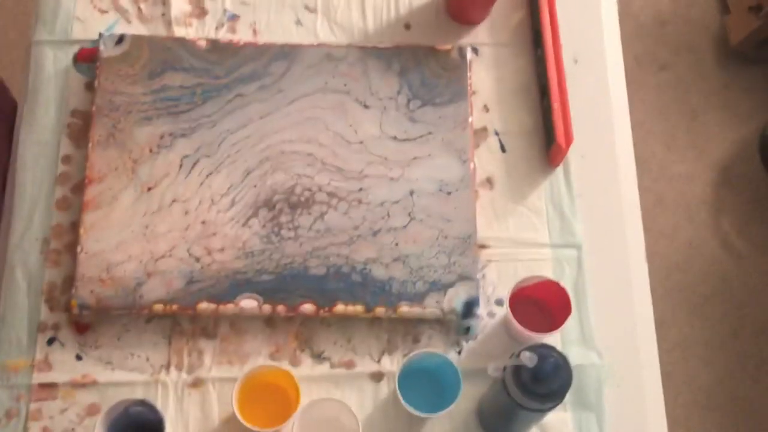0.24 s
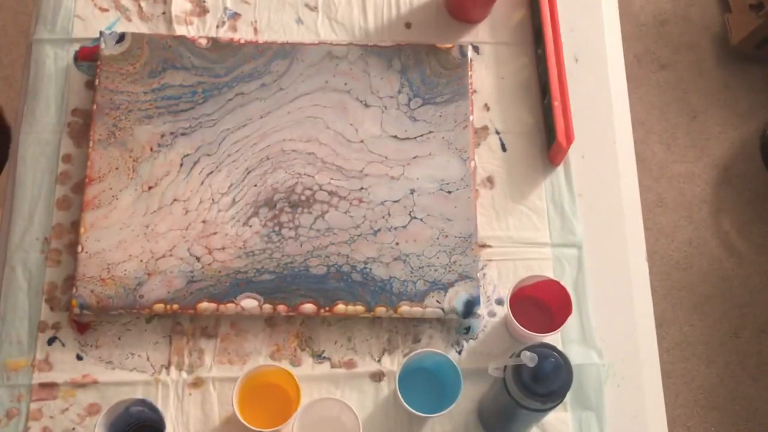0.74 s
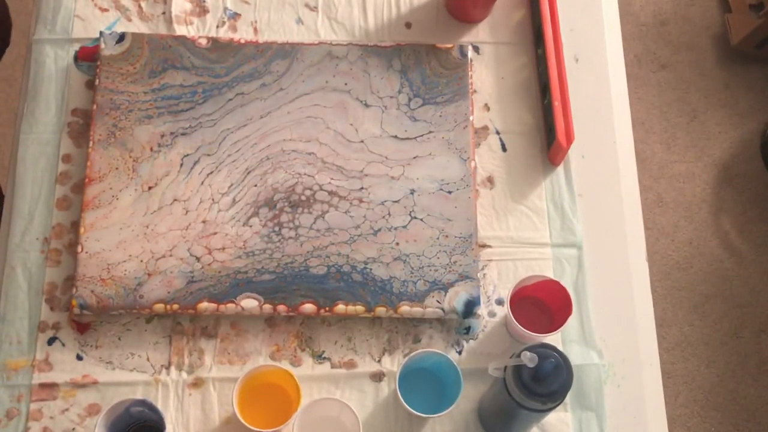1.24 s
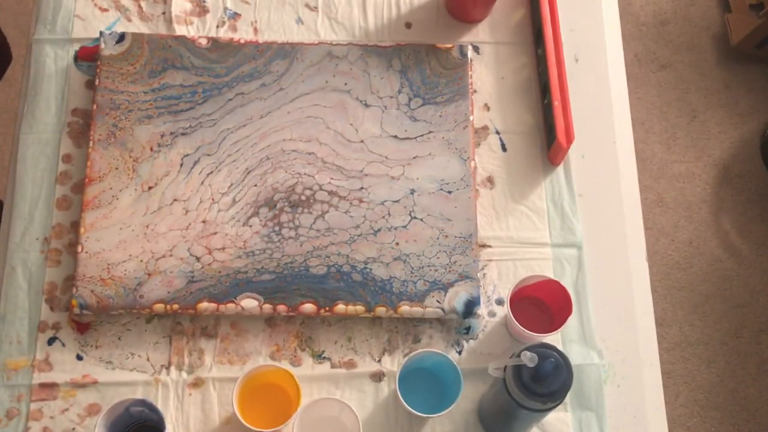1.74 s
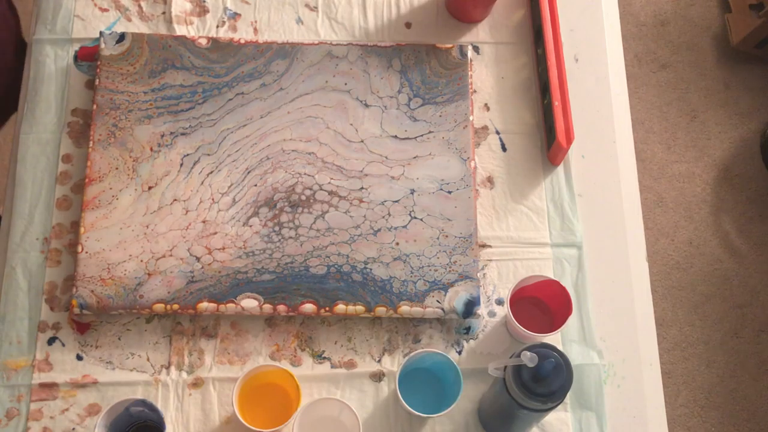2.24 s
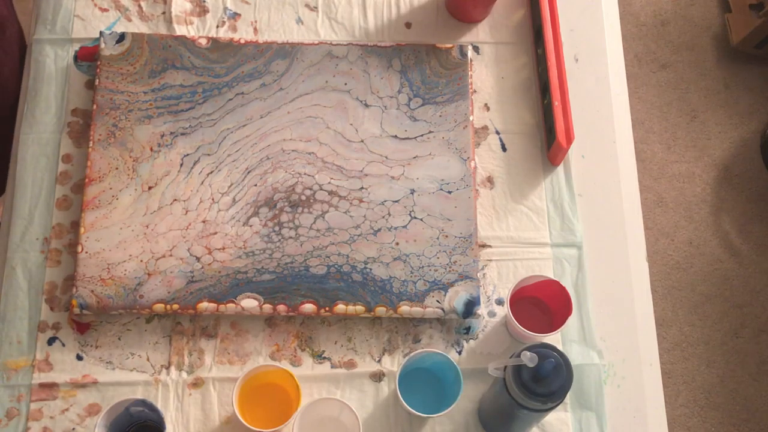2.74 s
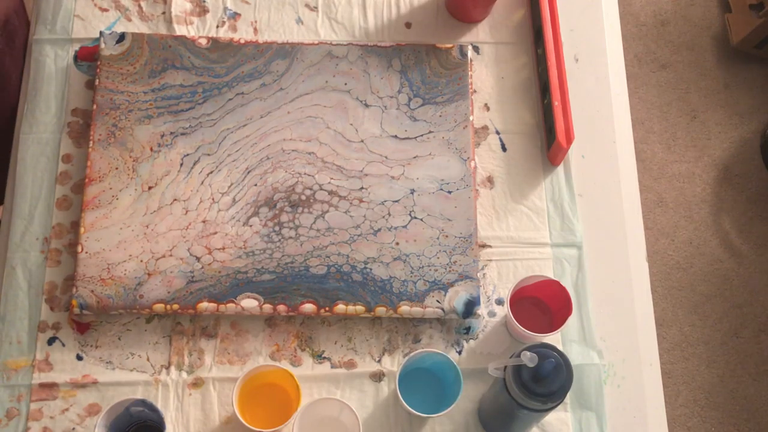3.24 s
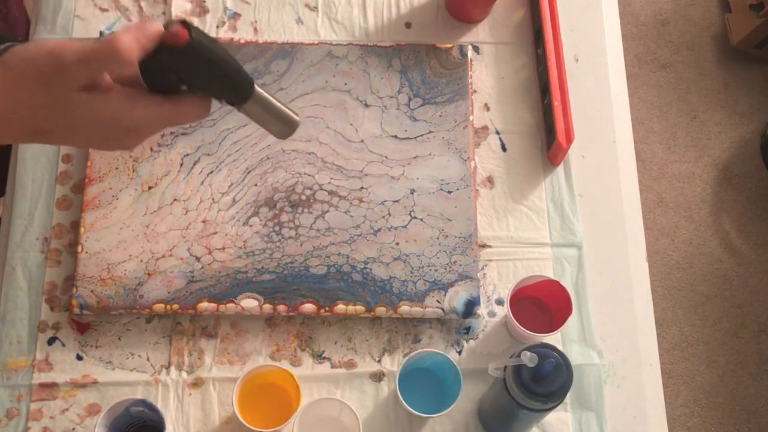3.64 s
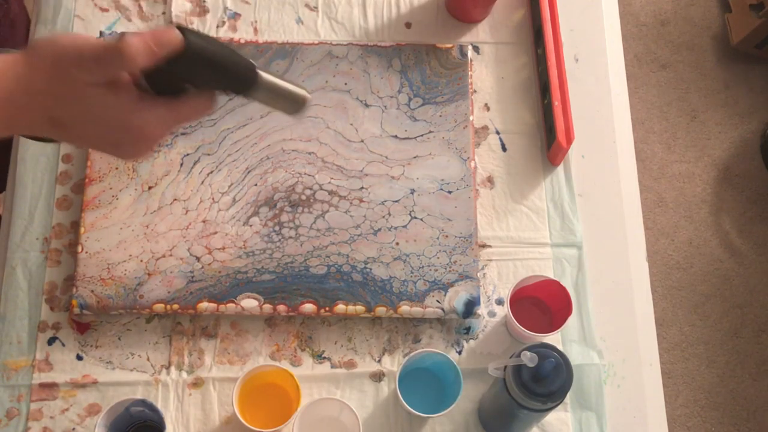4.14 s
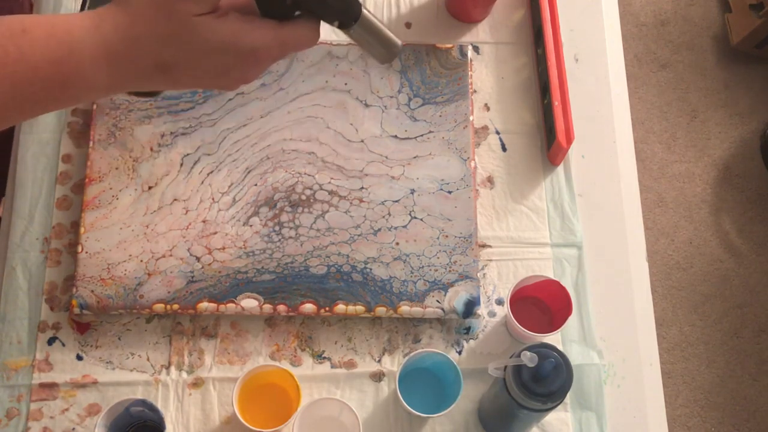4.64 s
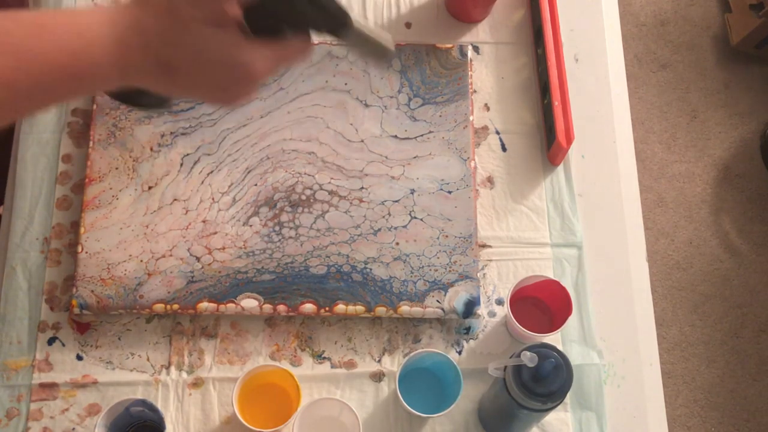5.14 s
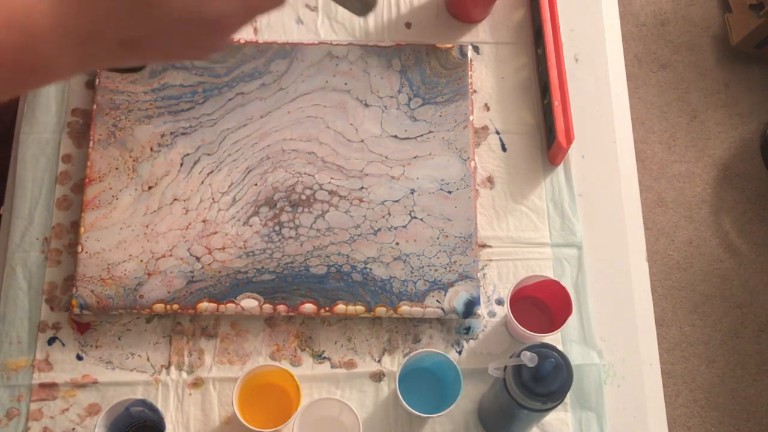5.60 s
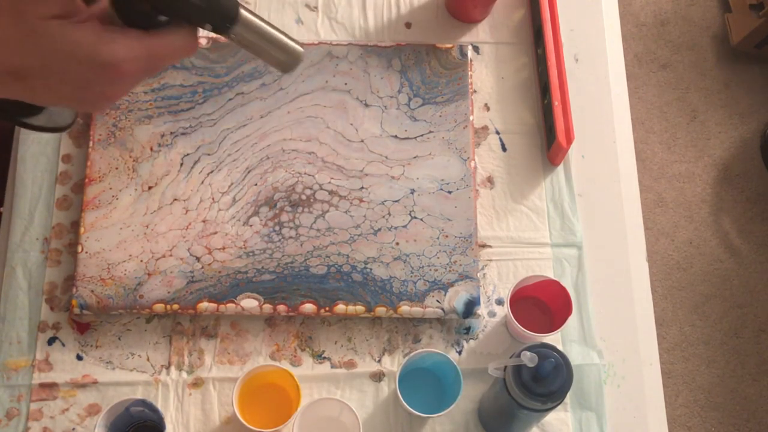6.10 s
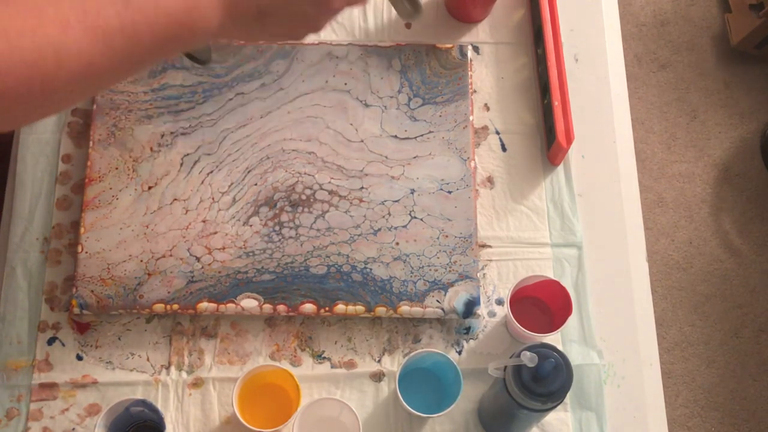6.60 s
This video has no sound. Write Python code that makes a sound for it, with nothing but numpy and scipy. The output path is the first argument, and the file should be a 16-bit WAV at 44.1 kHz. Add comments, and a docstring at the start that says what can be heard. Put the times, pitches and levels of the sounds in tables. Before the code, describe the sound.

A soft low bump opens, with fingers rubbing on plastic. Faint clicks follow, then a trigger is worked repeatedly with crisp clacks and bright metallic ticks, each squeeze releasing a steady gas hiss that soon cuts off. Two igniter snaps crack loudest, past the middle and near the end. Close microphone in a small quiet room, with short reflections, low room air and a faint high whine.

```python
"""Butane torch in a small room

A handheld butane torch is worked over a wet painting in a small, quiet room.
Clicks of trigger and catch, and two loud piezo snaps, are impacts on resonant bodies with room echoes.
Gas hiss and finger rubbing are shaped noise under moving gains; short sines make metallic pings.
A dull bump on the stand starts it; room air, a faint high sizzle and a thin whine lie behind."""
import sys
import numpy as np
from scipy import signal
from scipy.fft import rfft, irfft, next_fast_len
from scipy.io import wavfile

SR = 44100
rng = np.random.default_rng(int(sys.argv[2]) if len(sys.argv) > 2 else 0)


def pcm_store(signal):
    """Save signal as 16-bit PCM."""
    levels = np.round(np.clip(np.atleast_2d(signal), -1, 1) * 32767)
    wavfile.write(sys.argv[1], SR, levels.astype(np.int16).T)


N = 302526
BLOW_SIZE = 2048  # samples in one impact
BLOW_HZ = np.maximum(np.fft.rfftfreq(BLOW_SIZE, 1 / SR), 1)


def from_db(db):
    """Decibels to gain."""
    return 10 ** (np.asarray(db) / 20)


def unit_energy(x):
    """Scale to a sum of squares of one."""
    return x / np.sqrt(np.sum(x ** 2) + 1e-20)


def at_level(sound, db):
    """Give a blow the energy of 10 ms at this RMS level."""
    return unit_energy(sound) * from_db(db) * np.sqrt(SR / 100)


def gain_curve(rows):
    """Gain at every sample, interpolated in dB between rows of (s, dB)."""
    s, db = np.transpose(rows)
    return from_db(np.interp(np.arange(N) / SR, s, db))


def cut(x, hz, kind, order=2):
    """Butterworth low- or high-pass."""
    sections = signal.butter(order, min(hz, 0.45 * SR), kind, fs=SR, output="sos")
    return signal.sosfilt(sections, x)


def add(track, s, sound):
    """Mix a sound into the track at a time."""
    at = max(round(s * SR), 0)
    track[at:at + len(sound)] += sound[:N - at]


def at_hz(spectrum, hz):
    """Read rows of (Hz, dB) on a logarithmic frequency axis."""
    points_hz, db = np.transpose(spectrum)
    return np.interp(np.log(hz), np.log(points_hz), db)


def noise(spectrum):
    """Steady Gaussian noise with a density given as (Hz, dB per Hz)."""
    size = next_fast_len(N, real=True)
    hz = np.maximum(np.fft.rfftfreq(size, 1 / SR), 1)
    gain = from_db(at_hz(spectrum, hz)) * np.sqrt(SR / 2)
    return irfft(rfft(rng.standard_normal(size)) * gain, size)[:N]


def drift(rate):
    """A value that wanders around zero, through this many random points a second."""
    points = rng.standard_normal(N // 20)
    return np.interp(np.arange(N) * rate / SR, np.arange(len(points)), points)


def waver(rate, depth_db):
    """A gain that wanders at random in dB."""
    return from_db(depth_db * drift(rate))


def struck(db):
    """Minimum-phase impact on a damped body: everything starts at once, peaks ring on."""
    cepstrum = irfft(np.log(from_db(db)))
    cepstrum[1:BLOW_SIZE // 2] *= 2
    cepstrum[BLOW_SIZE // 2 + 1:] = 0
    return irfft(np.exp(rfft(cepstrum)))


def resonance(hz, width_hz):
    """Bell of height one over the frequencies of a blow."""
    return 1 / (1 + (2 * (BLOW_HZ - hz) / width_hz) ** 2)


def chatter(sound, gap_s, rebound):
    """Loose parts rebound at shrinking gaps: allpasses spread the blow without colouring it."""
    spectrum = rfft(sound)
    lags = np.round(gap_s * SR * rng.uniform(0.7, 1.3, size=3) / 2 ** np.arange(3))
    for lag in lags:
        delay = np.exp(-2j * np.pi * BLOW_HZ * lag / SR)
        spectrum = spectrum * (delay - rebound) / (1 - rebound * delay)
    return irfft(spectrum)


def room(sound, wet_db, t60, treble_t60, treble_db, ceiling_db):
    """Direct sound, a table bounce, two ceiling bounces and a diffuse tail, drawn anew for each call."""
    t = np.arange(SR // 2) / SR
    white = rng.standard_normal(len(t))
    dull = cut(white, 7000, "low", order=1)
    treble = white - dull
    tail = dull * from_db(-60 * t / t60) + treble * from_db(treble_db - 60 * t / treble_t60)
    response = from_db(wet_db) * unit_energy(tail * (1 - np.exp(-t / 0.00048)))
    response[int(rng.uniform(0.0014, 0.0022) * SR)] += from_db(-10)  # table
    response[(rng.uniform(0.009, 0.0105, size=2) * SR).astype(int)] += from_db(ceiling_db)
    response[0] += 1  # direct
    return signal.fftconvolve(sound, response)


# Room air. Each row: frequency in Hz, density in dB per Hz.
AIR_DENSITY = [(15, -107), (30, -98), (48, -74.5), (75, -88), (118, -81.5), (150, -90.5), (400, -90),
               (600, -89), (1050, -89.5), (1500, -96.5), (2200, -106), (3500, -114), (7000, -119),
               (16000, -122)]


def air():
    """Steady noise, strongest in the bass."""
    return noise(AIR_DENSITY)


# Narrow high sizzle. Each row: frequency in Hz, density in dB per Hz before wavering.
SIZZLE_DENSITY = [(3700, -135), (4150, -108), (4400, -95), (4580, -95), (4850, -102), (5100, -106),
                  (5350, -109), (5700, -109), (6300, -130)]


def sizzle():
    """Narrow noise band, its level wavering slightly."""
    return noise(SIZZLE_DENSITY) * waver(rate=11, depth_db=-0.5)


WHINE_HZ, WHINE_DRIFT_HZ, WHINE_DRIFTS_PER_S = 5050, 49.5, 1.5
WHINE_START_DB, WHINE_FADE_DB_PER_S = -72.5, 0.5
WHINE_SWELL_DB, WHINE_SWELLS_PER_S = 3.5, 3.8


def whine():
    """Thin, unsteady tone: narrow noise around a drifting pitch, swelling at random and slowly fading."""
    pitch_hz = WHINE_HZ + WHINE_DRIFT_HZ * drift(WHINE_DRIFTS_PER_S)
    phase = 2 * np.pi * np.cumsum(pitch_hz) / SR
    blur = cut(rng.standard_normal(N) + 1j * rng.standard_normal(N), 55, "low")
    tone = unit_energy((blur * np.exp(1j * phase)).real) * np.sqrt(N)  # unit RMS
    fade = from_db(WHINE_START_DB - WHINE_FADE_DB_PER_S * np.arange(N) / SR)
    return tone * fade * waver(WHINE_SWELLS_PER_S, WHINE_SWELL_DB)


# Bumps on the stand. Each row: start in seconds, gain in dB.
STAND_BUMPS = [(.008, -43.5), (.049, -30), (.087, -40.5)]
# Low modes of the stand. Each row: frequency in Hz, relative level in dB, t60 in seconds.
STAND_MODES = [(41.8, -7, 0.94), (74.7, -14, 0.52), (106.8, 2, 0.19), (138, -13, 0.1), (212, -14, 0.21),
               (313, -10, 0.1), (332.5, -3.5, 0.18)]
# Dull scuff that comes with a bump. Each row: frequency in Hz, relative density in dB per Hz.
SCUFF_DENSITY = [(20, -6), (60, 8.5), (170, -1), (370, -0.5), (450, -14), (1400, -18.5), (2600, -24),
                 (4500, -29), (16000, -49)]


def stand():
    """Soft bumps scuff the stand and set its low modes ringing."""
    out, t = np.zeros(N), np.arange(SR) / SR
    thud = sum(from_db(db - 60 * t / t60) * np.sin(2 * np.pi * hz * t) for hz, db, t60 in STAND_MODES)
    soft_onset = 1 - np.exp(-t / 0.0047)
    for s, db in STAND_BUMPS:
        scuff = from_db(-31.5) * noise(SCUFF_DENSITY)[:SR] * np.exp(-t / 0.032)
        add(out, s, from_db(db) * (thud + scuff) * soft_onset)
    return out


# Skin on plastic. Each row: frequency in Hz, density in dB per Hz before motion.
RUB_DENSITY = [(700, -120), (1600, -102), (2700, -103), (4000, -107), (7500, -116), (8600, -112),
               (10500, -120), (12000, -116), (16000, -119)]
# Fingers shift on the grip. Each row: middle in seconds, time from middle to 1/e in seconds, gain in dB.
GRIP_SHIFTS = [(0.055, 0.044, 12.5), (0.424, 0.18, -3), (0.77, 0.048, -2.5), (1.19, 0.13, -2.5),
               (2.503, .85, -3), (3.52, .05, 4)]
HOLD_DB = -12.5  # gain of the hand that merely holds on


def fingers():
    """Skin sticks and slips on the plastic grip; now and then a slip gives a tiny tick."""
    t = np.arange(N) / SR
    shifting = sum(from_db(db) * np.exp(-((t - s) / fall_s) ** 2) for s, fall_s, db in GRIP_SHIFTS)
    motion = from_db(HOLD_DB) + shifting
    rub = noise(RUB_DENSITY) * waver(rate=81, depth_db=5)
    slips = (rng.random(N) < 16 / SR) * from_db(rng.normal(-46.0, 3, N))  # 16 per s on average
    return (rub + cut(slips, 4000, "high")) * motion


# Torch body resonances. Each row: frequency in Hz, width in Hz, mean lift in dB before tilting.
BODY_RESONANCES = [(1577, 620, 16.5), (2610, 790, 5), (3980, 420, 5), (5890, 470, 1.5), (8540, 840, 2.5),
                   (8850, 190, -2), (11400, 700, 2.5), (15100, 1300, 1.5)]
# Edges of the hollow, middle, bright and top registers [Hz].
REGISTER_BOUNDS_HZ = [900, 2300, 6500, 12500, 16000]


def body_response(levels_db, scatter_db, low_hz):
    """Body resonances in dB, lifted differently on every blow, tilted toward the register levels."""
    db = 20 * np.log10(BLOW_HZ ** 3 / (BLOW_HZ ** 3 + low_hz ** 3) + 1e-3)
    for hz, width_hz, lift_db in BODY_RESONANCES:
        db = db + (lift_db + scatter_db * rng.standard_normal()) * resonance(hz, width_hz)
    bands = list(zip(REGISTER_BOUNDS_HZ, REGISTER_BOUNDS_HZ[1:]))
    own_db = []
    for low, high in bands:
        inside = (BLOW_HZ > low) & (BLOW_HZ < high)
        own_db.append(10 * np.log10(np.sum(from_db(db[inside]) ** 2)))
    centres_hz = np.sqrt(np.prod(bands, axis=1))
    tilt = np.transpose([centres_hz, np.subtract(levels_db, own_db)])
    return db + at_hz(tilt, BLOW_HZ)


TICKS_PER_S, TICK_DB, TICK_SPREAD_DB = 1.8, -60, 4


def faint_ticks():
    """Loose parts tick at random moments, each with its own strength and colour; rows as for clicks."""
    count = int(TICKS_PER_S * N / SR)
    s = (np.arange(count) + rng.random(count)) * (N / SR) / (count + 1)
    levels_db = [TICK_DB, 0, 0] + TICK_SPREAD_DB * rng.standard_normal((count, 3))
    return np.column_stack([s, levels_db])


HAND_ECHO_DB, HAND_ECHO_S = -9, (0.0003, 0.0009)


def off_hand(sound):
    """A very early bounce off the hand, with a new delay each time, ripples the colour of a click."""
    lag = int(rng.uniform(*HAND_ECHO_S) * SR)
    return sound + from_db(HAND_ECHO_DB) * np.pad(sound, (lag, 0))[:len(sound)]


# Trigger and catch clicks. Each row: start in seconds, direct level in dB over 10 ms,
# hollow ring in dB and brightness in dB, both against the middle register.
TRIGGER_CLICKS = [(.126, -50, -10, -2), (.1728, -51.5, -13, -6), (.8126, -56.5, -10, -3),
                  (.8396, -49.5, 8, 4), (.975, -56, 6, -4.5), (1.1718, -54.8, -2, -7),
                  (1.359, -48.5, -5, -3), (1.4095, -46.5, 5.5, 4.5), (1.482, -29.5, -8, -4.5),
                  (1.6774, -51, 3, -3), (1.8046, -21.5, -1.5, 4.5), (2.092, -50.6, -6, -6),
                  (2.1334, -37, 0, -5), (2.285, -49.5, 2, -8), (2.357, -47, 2, -3),
                  (2.3679, -30.5, 0.5, -5.5), (2.5776, -50.5, 0, -3), (2.6808, -23, 1.5, 6.5),
                  (3.006, -38, 11, -1), (3.0744, -40.2, 1.5, -1), (3.447, -54, 7, 1.5),
                  (3.5454, -31, -1.5, 1.5), (3.6984, -49, 6, 1.5), (3.7522, -51.5, -3, 5),
                  (3.9217, -22.5, 0.5, 8), (4.371, -47.5, 7.5, 0.5), (4.4387, -42.5, 9.5, -8),
                  (4.4645, -28.5, -2.5, 5), (4.7389, -48, -17, -3), (4.7713, -28, -4.5, 1.5),
                  (5.0818, -23, -1.5, 6), (5.3841, -41, 1, 10), (5.4054, -40.5, 4, -7), (5.4357, -43, 0, 2),
                  (5.442, -44.5, 4, 3), (5.713, -56, -2, 1), (5.8274, -28.5, -6.5, -2),
                  (5.9773, -50, 1, -1), (6.0418, -47.5, 5, -3), (6.2087, -24.5, -2.5, 1.5),
                  (6.601, -41.5, 0, -8), (6.6122, -30, -10.5, -2.5)]
TOP_LOSS_DB = 4.0  # top register under the bright one
LEAD_IN_S, LEAD_IN_UNDER_DB = 0.0042, 27.5


def trigger():
    """Impacts ring the body, each with its own register balance; a very faint 4 ms noise leads into each."""
    out = np.zeros(N)
    for s, db, hollow_db, bright_db in [*TRIGGER_CLICKS, *faint_ticks()]:
        registers_db = [hollow_db, 0, bright_db, bright_db - TOP_LOSS_DB]
        body = struck(body_response(registers_db, scatter_db=3.5, low_hz=992))
        lead_in = np.convolve(rng.standard_normal(int(LEAD_IN_S * SR)), body)
        add(out, s - LEAD_IN_S, at_level(lead_in, db - LEAD_IN_UNDER_DB))
        click = at_level(off_hand(chatter(body, gap_s=0.00056, rebound=0.53)), db)
        add(out, s, room(click, wet_db=-3.5, t60=0.24, treble_t60=0.19, treble_db=-3.0, ceiling_db=-15.5))
    return out


# Valve held open. Each row: start in seconds, end in seconds.
VALVE_SPANS = [(1.48, 2.17), (2.35, 3.12), (3.53, 5.38), (5.815, 7.02)]
# Gas jet. Each row: frequency in Hz, density in dB per Hz before flow, nearness and wavering.
JET_DENSITY = [(500, -112), (1500, -96), (2200, -101), (3000, -101.5), (3900, -102.5), (7000, -102.5),
               (7800, -106), (8800, -103.5), (9700, -106), (10400, -111.5), (11500, -106), (13000, -107.5),
               (16000, -111)]
# Hand carries the nozzle nearer and farther. Each row: time in seconds, hiss gain in dB.
NOZZLE_NEARNESS = [(1.5, -0.5), (3.0, -2), (3.85, -2), (4.3, 2), (5.0, 0), (5.9, -5.5), (6.6, 4),
                   (6.86, -4.5)]
VALVE_OPEN_S, VALVE_FADE_S, LEAK_DB = 0.021, 0.06, -38  # rise time, decay to 1/e, constant leak gain


def gas():
    """The jet hisses while the trigger holds the valve open, and dies away as the pipe empties."""
    t = np.arange(N) / SR
    flow = from_db(LEAK_DB)
    for start_s, end_s in VALVE_SPANS:
        opening = np.clip((t - start_s) / VALVE_OPEN_S, 0, 1)
        emptying = np.exp(-np.maximum(t - end_s, 0) / VALVE_FADE_S)
        flow = flow + opening * emptying
    return noise(JET_DENSITY) * flow * gain_curve(NOZZLE_NEARNESS) * waver(rate=25, depth_db=1.0)


# Trigger thuds against its stop. Each row: start in seconds, direct handle thud in dB over 10 ms,
# direct nozzle ping in dB over 10 ms.
STOP_KNOCKS = [(1.4815, -41, -37), (2.3681, -41, -48), (3.5454, -39.5, -28), (4.7724, -39, -33),
               (5.8292, -39, -30)]
# Hollow handle. Each row: frequency in Hz, relative response in dB.
HANDLE_RESPONSE = [(150, -24), (400, -10.5), (700, 0), (900, -5.5), (1200, 7), (1600, -19), (3000, -5.5),
                   (16000, -46)]


def handle():
    """At the end of its travel the trigger also sets the hollow handle knocking."""
    out = np.zeros(N)
    for s, db, _ in STOP_KNOCKS:
        knock = at_level(struck(at_hz(HANDLE_RESPONSE, BLOW_HZ)), db)
        add(out, s, room(knock, wet_db=-1.5, t60=0.2, treble_t60=0.28, treble_db=-1.5, ceiling_db=-23.5))
    return out


# Short metallic pings of spring and tube, each at its own pitch, sometimes two together.
# Each row: start in seconds, frequency in Hz, direct level in dB over 10 ms.
METAL_PINGS = [(2.681, 5900, -36), (2.681, 9330, -28), (3.922, 8960, -29.5), (4.4646, 9030, -34.5),
               (5.8277, 3980, -36.5), (5.8282, 8300, -32.5), (6.2086, 9200, -30), (6.6123, 9200, -37)]
NOZZLE_HZ = 14440


def pings():
    """Spring and tube, and nozzle at each stop knock: sines that swell and die within a millisecond or so."""
    out, t = np.zeros(N), np.arange(BLOW_SIZE) / SR
    swell = t * np.exp(-t / 0.00022)
    nozzle_pings = [(s, NOZZLE_HZ, db) for s, _, db in STOP_KNOCKS]
    for s, hz, db in [*METAL_PINGS, *nozzle_pings]:
        ping = at_level(np.sin(2 * np.pi * hz * t) * swell, db)
        add(out, s, room(ping, wet_db=-6.5, t60=0.25, treble_t60=0.18, treble_db=-14.5, ceiling_db=-18.5))
    return out


# Piezo hammer blows. Each row: start in seconds, direct level in dB over 10 ms, added hollow body ring in dB.
PIEZO_SNAPS = [(3.9848, -16, -2), (6.2798, -16, 2.5)]
# Igniter with hammer and spring. Each row: frequency in Hz, relative response in dB.
IGNITER_RESPONSE = [(250, -43.5), (700, -22.5), (1050, -31.5), (1600, -2), (2350, -14.5), (3200, -5.5),
                    (4500, -2), (5100, -3), (6100, -6), (7300, -19.5), (8400, -8.5), (9300, -11),
                    (10200, -16.5), (16000, -16.5)]


def piezo():
    """The sprung hammer hits the crystal: one hard blow, thrown back five times by the nearest walls."""
    out = np.zeros(N)
    hollow_hz, hollow_width_hz, _ = BODY_RESONANCES[0]
    for s, db, hollow_db in PIEZO_SNAPS:
        hollow_ring = hollow_db * resonance(hollow_hz, hollow_width_hz)
        blow = struck(at_hz(IGNITER_RESPONSE, BLOW_HZ) + hollow_ring)
        snap = at_level(chatter(blow, gap_s=0.00035, rebound=0.43), db)
        add(out, s, room(snap, wet_db=-2.0, t60=0.27, treble_t60=0.17, treble_db=1.5, ceiling_db=-23))
        for lag_s in rng.uniform(0.004, 0.028, size=5):
            echo = chatter(blow, gap_s=0.0005, rebound=0.38)
            add(out, s + lag_s, at_level(echo, db - 19.5 - 170 * lag_s))  # later is weaker
    return out


def scene():
    """The torch and the bumped stand over the background of the room."""
    background = air() + sizzle() + whine()
    torch = fingers() + trigger() + gas() + handle() + pings() + piezo()
    return (background + stand() + torch)[None]


CUTOFF_HZ, ROUNDING_LEVEL = 16000, 1.9


def record(dry):
    """Round the loudest peaks softly, then cut the top steeply."""
    rounded = ROUNDING_LEVEL * np.tanh(dry / ROUNDING_LEVEL)
    steep = signal.ellip(10, 0.2, 70, CUTOFF_HZ, fs=SR, output="sos")
    return signal.sosfilt(steep, rounded)


dry = scene()
out = record(dry)
pcm_store(out)
```